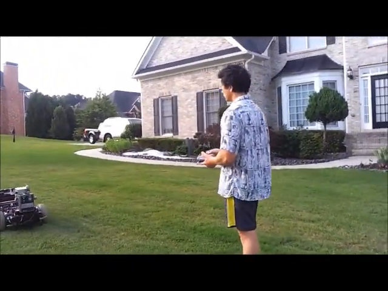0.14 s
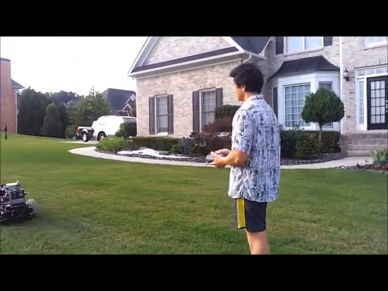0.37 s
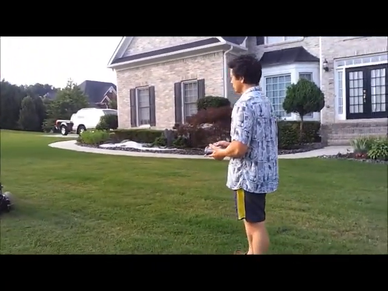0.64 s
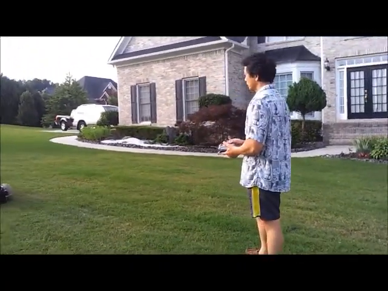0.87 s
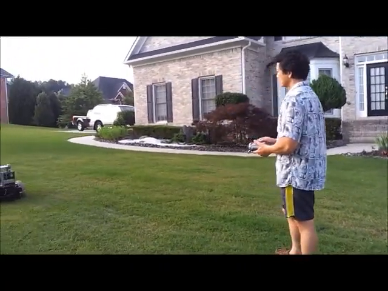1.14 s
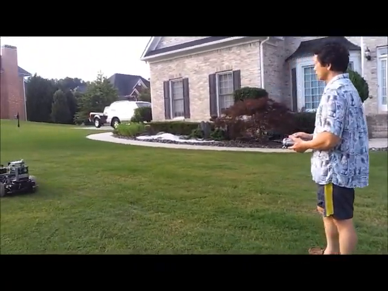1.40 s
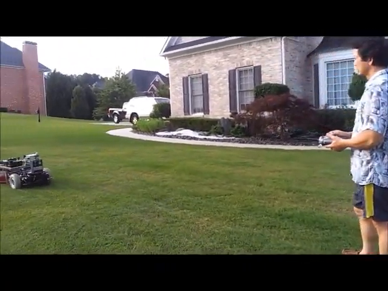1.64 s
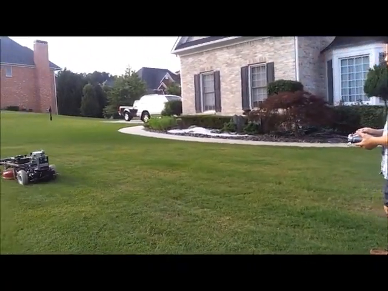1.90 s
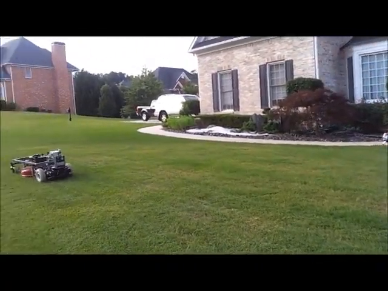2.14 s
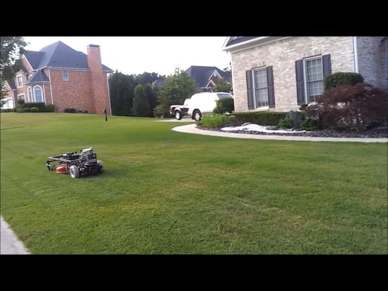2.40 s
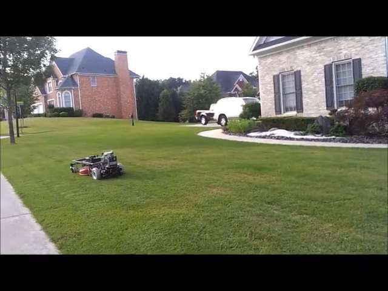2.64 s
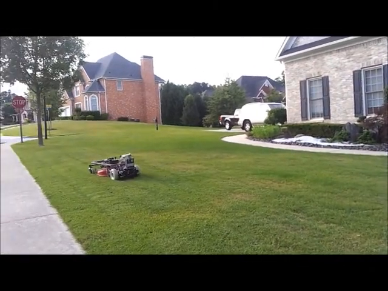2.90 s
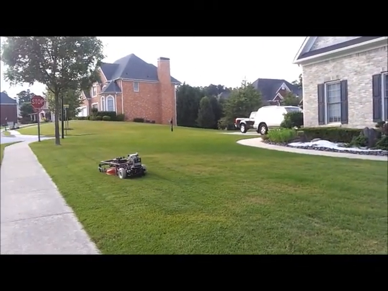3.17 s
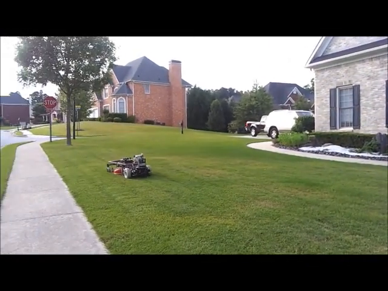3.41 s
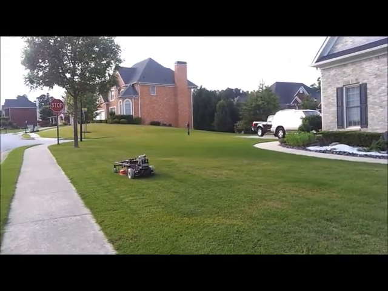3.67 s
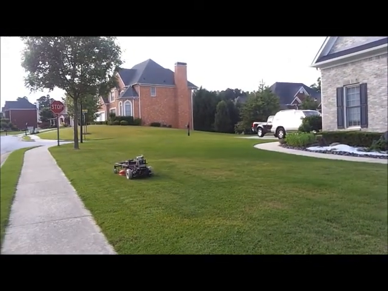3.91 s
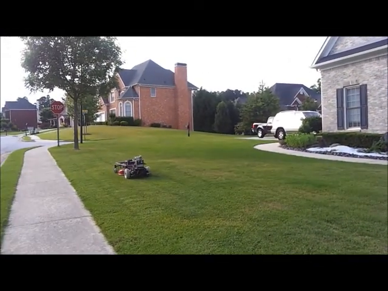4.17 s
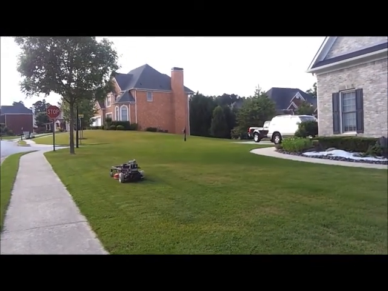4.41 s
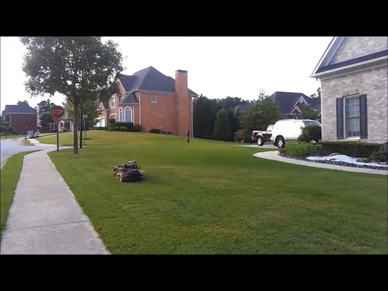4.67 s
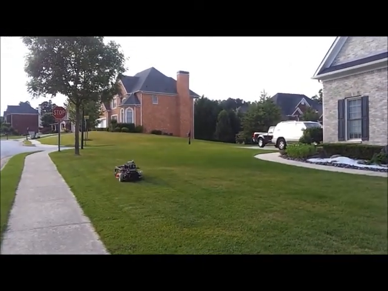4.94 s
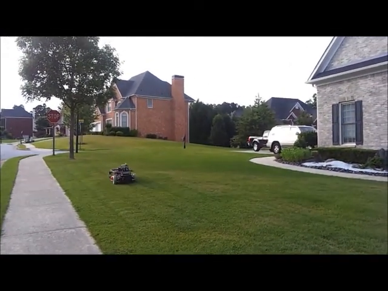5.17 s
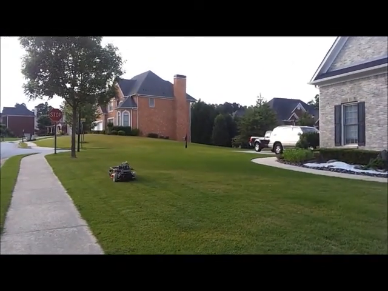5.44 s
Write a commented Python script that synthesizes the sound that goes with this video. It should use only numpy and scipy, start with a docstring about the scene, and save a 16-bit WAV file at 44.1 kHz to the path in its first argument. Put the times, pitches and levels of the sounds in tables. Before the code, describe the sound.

A small petrol lawnmower putters unevenly across an open lawn, its hissing, rattling exhaust fading as it drives away from the listener.

```python
"""Lean mower driving away

On a lawn, a small four-stroke mower engine runs lean and draws away from one microphone point.
About every other cycle fails to fire. Each exhaust stroke thumps in the muffler, rattles its shell
and blows a hissing jet through the outlet, whose plate rings. The blade hums and roars under the deck;
late on, a chip ticks against it. Pulses, shaped noise, resonators and two sines make these sounds."""
import sys
import numpy as np
from scipy import signal
from scipy.io import wavfile
from scipy.ndimage import uniform_filter1d, map_coordinates

SR = 44100
rng = np.random.default_rng(int(sys.argv[2]) if len(sys.argv) > 2 else 0)


def attenuation_scalar(level_db):
    """Turn a level in dB into a linear amplitude multiplier (20 dB per decade)."""
    decades = np.asarray(level_db, float) / 20
    return 10 ** decades


def dump(signal):
    """Clip the signal to [-1, 1] and save it as 16-bit WAV at the path in sys.argv[1]."""
    limited = np.clip(np.atleast_2d(signal).T, -1, 1)
    pcm = np.round(limited * 32767).astype(np.int16)
    wavfile.write(sys.argv[1], SR, pcm)


N = 245195  # samples

# The mower draws away and turns: t/s, loss as level/dB, turned away [0-1]
DRAWING_AWAY = [(0, 0.0, 0.27), (.5, -0.65, 0.24), (.9, 0.5, 0.3), (1.4, -0.2, 0.37), (2.15, -0.9, 0.47),
                (2.4, -3.5, 0.52), (3.2, -5, 0.58), (3.5, -7.5, 0.65), (4.1, -7.5, 0.66), (4.5, -8.5, 0.75),
                (5.1, -9.5, 0.63), (5.56, -9.5, 0.7)]
# The governor hunts: t/s, rate [exhaust strokes per s]
STROKE_RATE = [(0, 23.85), (.4, 23.81), (.75, 23.63), (1.35, 23.92), (2.1, 23.63), (2.7, 24.02),
               (3.1, 23.85), (3.4, 24.06), (3.9, 23.75), (4.15, 23.96), (4.3, 23.45), (4.65, 23.26),
               (4.82, 24.03), (5.15, 23.64), (5.56, 23.55)]
# Firing and misfire take turns, but these strokes repeat the one before: t/s
REPEATED_STROKES = [.733, .818, 1.197, 1.406, 2.625, 2.834, 3.377, 4.172, 4.256, 4.384, 4.513, 4.684, 4.853,
                    5.231, 5.401, 5.485, 5.528]
# Strokes whose jet stands out, loud or faint: t/s, level/dB against its neighbours
ODD_JETS = [(.018, 2), (.144, 5), (.606, 4), (.649, 5.5), (.733, 2.5), (.775, 7.5), (.818, 6), (.987, -1),
            (1.029, -4), (1.071, 3.5), (1.155, 8), (1.197, -7), (1.406, -17), (1.574, 5), (1.658, 5),
            (1.742, 2.5), (1.868, 1), (1.995, 11), (2.037, -3), (2.079, 7.5), (2.248, 6), (2.542, -3.5),
            (3.085, 6), (3.127, 3), (3.169, 5), (3.211, 3.5), (3.336, 5), (3.377, -9), (3.544, 0),
            (3.795, -0.5), (3.963, 1.5), (4.172, 8), (4.214, -6), (4.727, -6.5), (4.811, -7), (4.853, 2.5),
            (4.936, 4.5), (5.02, 2), (5.273, 5), (5.485, -1.5), (5.528, 3.5)]
# The blade hum wavers: t/s, tone level/dB, octave level/dB
BLADE_HUM = [(0, -37, -40.5), (.55, -45.5, -37), (.95, -43, -43), (1.4, -48, -39), (1.7, -42, -38.5),
             (2.2, -42.5, -44.5), (2.4, -39, -40), (3.15, -40, -45), (3.3, -39, -36), (3.45, -37.5, -50.5),
             (3.75, -40.5, -43), (4, -43.5, -58), (4.4, -48.5, -42), (5.05, -48.5, -47.5),
             (5.3, -70, -38.5), (5.56, -59, -58)]
# Colour of the deck roar, side on and then turned away: f/Hz, relative level/dB per Hz
ROAR_COLOURS = ([(210, 0.5), (300, 7), (370, -1), (560, 1), (820, 0), (949, -1), (1320, -10), (1590, -13),
                 (1880, -3.5), (2200, -18.5), (3740, -3.5), (5190, -9), (6760, -5), (8810, -0.5),
                 (10600, 2.5), (13000, -5), (14500, -11.5)], [(210, 8.5), (300, 9), (360, 0.5), (450, 5),
                 (604, -0.5), (878, -7), (1090, 1), (1490, 1), (1940, -3), (2170, 11), (2420, -14),
                 (2610, -13), (3460, -10), (4650, -2.5), (6400, -8.5), (9820, -3), (14500, -6)])
# Colour of the jet, side on and then turned away: f/Hz, relative level/dB per Hz
JET_COLOURS = ([(1760, -38), (3000, -34), (3750, -35), (4060, -17), (4400, -20), (5150, -10.5),
                (5990, -9.5), (7850, -8.5), (8840, -7), (10600, 7), (13000, -7), (14100, -13),
                (15000, -20.5)], [(1760, -8.5), (3000, -4.5), (3450, -11), (4230, -9.5), (5950, -11),
                (6880, -6.5), (7550, -6), (8170, -5.5), (8960, -3.5), (9890, 2), (11700, -4.5),
                (12600, -1.5), (14500, -4.5)])
# The bright band of the hiss wanders as the mower turns: t/s, f/Hz, lift as level/dB
BRIGHT_BAND = [(0.1, 10500, 0.5), (0.98, 10600, 2.5), (1.29, 10050, 5), (2.23, 10800, 4), (2.5, 9600, 3.5),
               (3.68, 11800, 2.5), (4.17, 9300, 2), (5.27, 9500, 5.5), (5.45, 10600, 3)]
# A hollow below the bright band drifts and deepens: t/s, f/Hz, depth as level/dB
DRIFTING_HOLLOW = [(0, 6700, 2), (1.1, 6800, 1), (1.6, 6740, -1), (2.9, 6760, 6), (3.5, 6070, 7),
                   (4, 6140, 0.5), (5.1, 6000, 12), (5.56, 6170, 5)]
# Shell rattle of a fired and of a missed stroke: t/ms after the stroke mark, rise/ms, fall/ms, level/dB
FIRED_BURSTS = [(-14, 1, 3.1, 6.5), (-4.5, 1, 6.9, -0.5), (3.5, 1, 5.6, 0.5)]
MISSED_BURSTS = [(-6, 0.15, 5.8, 2.1), (3, 0.28, 2.8, 5.9)]
# Resonances of the shell: f/Hz, width/Hz, side-on level/dB, turned-away level/dB
SHELL_MODES = [(464, 31, -5, -6), (704, 130, -1, -4), (1101, 148, -2, 3), (1339, 102, 7, -2.5),
               (1862, 94, 6, -4.5), (2080, 220, -5.5, -1.5), (2590, 285, -7.5, 4),
               (3350, 1100, -10.5, -1.5), (3910, 470, -3.5, 2.5), (5050, 1600, -5.5, -5.5)]
# Rings of the outlet plate slide as the mower turns: t/s, f/Hz, level/dB against the jet
PLATE_LOW = [(0, 2570, -36), (1.2, 2720, -32), (1.5, 2770, -26), (2.15, 2750, -20.5), (2.5, 2640, -20),
             (3.2, 2600, -19.5), (3.7, 2640, -20), (4.4, 2590, -17), (5, 2580, -21), (5.56, 2590, -21.5)]
PLATE_HIGH = [(0, 5200, -23), (.6, 5180, -23.5), (1.05, 5200, -18), (1.3, 5300, -30), (1.6, 5250, -26),
              (1.9, 5200, -28), (2.1, 5080, -23), (2.4, 5020, -22.5), (3.2, 4960, -21), (3.6, 4980, -27),
              (4.4, 4970, -26), (5.56, 4970, -32)]
# Muffler pulses of every push, of the blowdown of a firing and of the gas sucked back by a misfire:
# t/ms after the stroke mark, f/Hz, t60/s, level/dB, sign
PUSH_PULSES = [(3.2, 154, .048, -1, 1), (.7, 224, .026, 0, -1)]
BLOWDOWN_PULSES = [(-7.7, 171, .059, 1.5, -1), (-17.1, 225, .108, -6, -1), (-17, 700, .03, -8, 1)]
BACKFLOW_PULSES = [(-6.3, 278, .116, -9.5, 1), (-4.3, 127, .01, 7, -1), (-5, 650, .012, -6, -1)]
# A chip strikes the deck: t/s, level/dB before the band-pass, f/Hz
CHIP_STRIKE = [(4.1643, -19.5, 2660), (4.1646, -18.5, 3080)]


def in_time(rows):
    """Columns of a curve, interpolated at every sample."""
    s, *columns = np.transpose(rows)
    return [np.interp(np.arange(N) / SR, s, column) for column in columns]


def rms_one(x):
    """Scale to unit rms."""
    return x / np.sqrt(np.mean(x ** 2) + 1e-20)


def lowpass(x, order, cutoff_hz):
    """Butterworth low-pass."""
    return signal.sosfilt(signal.butter(order, cutoff_hz, fs=SR, output="sos"), x)


def bandpass(x, low_hz, high_hz):
    """Butterworth band-pass."""
    return signal.sosfilt(signal.butter(2, [low_hz, high_hz], "band", fs=SR, output="sos"), x)


def clicks(s, size):
    """Impulses at the given times."""
    out = np.full(N, 1e-18)
    at = np.round(s * SR).astype(int)
    inside = (at >= 0) & (at < N)
    out[at[inside]] += (size * np.ones(len(at)))[inside]
    return out


def ring(x, hz, t60):
    """A unit click sets a decaying sine of starting height 1 ringing."""
    r, w = attenuation_scalar(-60 / (t60 * SR)), 2 * np.pi * hz / SR
    return signal.lfilter([0, np.sin(w)], [1, -2 * r * np.cos(w), r * r], x)


def swell(s, size, rise_ms, fall_ms):
    """Envelopes that peak at the given times, growing and dying exponentially."""
    x = clicks(s, size)
    up, down = np.exp(-1000 / (SR * np.array([rise_ms, fall_ms])))
    after = signal.lfilter([1], [1, -down], x)
    before = signal.lfilter([0, up], [1, -up], x[::-1])[::-1]
    return after + before


def flutter(rate_hz, depth_db):
    """Fast random gain of turbulence."""
    return attenuation_scalar(depth_db * rms_one(lowpass(rng.standard_normal(N), 2, rate_hz)))


def coloured(spectra, turned, patchy_db):
    """Noise of rms 1 passing from side-on to turned-away colour, in flickering patches."""
    hz, s, frames = signal.stft(rng.standard_normal(N), SR, nperseg=512)
    at = np.minimum(s * SR, N - 1).astype(int)
    hz = np.maximum(hz, 1)[:, None]
    side_on, away = (np.interp(np.log(hz), np.log(f), db) for f, db in map(np.transpose, spectra))
    bright_hz, lift_db = in_time(BRIGHT_BAND)
    hollow_hz, depth_db = in_time(DRIFTING_HOLLOW)
    db = side_on + turned[at] * (away - side_on)
    db += lift_db[at] * np.exp(-((hz - bright_hz[at]) / 1570) ** 2)  # width/Hz
    db -= depth_db[at] * np.exp(-((hz - hollow_hz[at]) / 520) ** 2)
    # each patch spans about 3 bins and 4 frames
    grid = np.indices(db.shape) / [[[3]], [[4]]]
    patches = map_coordinates(rng.standard_normal(db.shape), grid, order=1)
    gain = attenuation_scalar(db + patchy_db * patches)
    gain /= np.sqrt(np.mean(attenuation_scalar(db) ** 2, axis=0))  # even level from frame to frame
    return rms_one(signal.istft(frames * gain, SR, nperseg=512)[1][:N])


def strokes():
    """Exhaust stroke times, whether each fired, how far its jet stands out, and the running stroke count."""
    rate, = in_time(STROKE_RATE)
    count, t = np.cumsum(rate) / SR, np.arange(N) / SR
    count -= np.interp(0.0182, t, count)  # t/s of the first stroke, itself a misfire
    s = np.interp(np.arange(int(count[-1]) + 1), count, t)

    def nearest(times):
        return np.abs(s[:, None] - times).argmin(axis=0)

    changes, odd_db = np.ones(len(s), int), np.zeros(len(s))
    changes[nearest(np.array(REPEATED_STROKES))] = 0
    odd_s, odd_level_db = np.transpose(ODD_JETS)
    odd_db[nearest(odd_s)] = odd_level_db
    fired = np.cumsum(changes) % 2 == 0
    return s, fired, odd_db, count


def blade(count):
    """Two blade tips, two turns a cycle: four passes for every stroke sound a tone and its octave."""
    tone_db, octave_db = in_time(BLADE_HUM)
    passes = 8 * np.pi * count  # phase in radians
    tone = attenuation_scalar(tone_db) * np.cos(passes - 2.25)
    octave = attenuation_scalar(octave_db) * np.cos(2 * passes + 0.2)
    return np.sqrt(2) * (tone + octave)


def rumble():
    """Low churning of air under the deck."""
    return rms_one(bandpass(rng.standard_normal(N), 70, 330))


def deck_roar(turned):
    """Turbulent air under the deck: coloured noise with a fast random gain."""
    return flutter(rate_hz=62, depth_db=1.5) * coloured(ROAR_COLOURS, turned, patchy_db=3.5)


def shell(fired, missed, turned):
    """Knocks and noise bursts at the valve events ring the resonances of the sheet metal."""
    envelope, knocks = 0.56, 0  # the noise never quite stops between bursts
    for s, bursts in ((fired, FIRED_BURSTS), (missed, MISSED_BURSTS)):
        for ms, rise, fall, db in bursts:
            luck_db = 1.3 * rng.standard_normal(len(s))
            envelope = envelope + swell(s + ms / 1000, attenuation_scalar(db + luck_db), rise, fall)
            # a knock starts each burst, 15.5 dB against its noise
            knocks = knocks + clicks(s + (ms - rise) / 1000, attenuation_scalar(db + 15.5))
    drive = envelope * rng.standard_normal(N) + knocks
    growl_db = 6.5 * (1 - turned)  # lift of the low resonances, gone when turned away
    out = 0
    for k, (hz, width, side_db, away_db) in enumerate(SHELL_MODES):
        r = np.exp(-np.pi * width / SR)
        poles = [1, -2 * r * np.cos(2 * np.pi * hz / SR), r * r]
        mode = signal.lfilter([(1 - r * r) / 2, 0, (r * r - 1) / 2], poles, drive)
        gain = attenuation_scalar(side_db + turned * (away_db - side_db) + growl_db * (hz < 800))
        sign = (-1) ** k  # neighbouring modes alternate in sign
        out = out + sign * gain * flutter(rate_hz=16, depth_db=1.5) * mode
    return rms_one(lowpass(out, 6, 5700))


def moving_ring(x, rows, width_hz):
    """A resonance whose centre slides: shift down, one-pole low-pass, shift back; white noise keeps its rms."""
    hz, db = in_time(rows)
    turn = np.exp(2j * np.pi * np.cumsum(hz) / SR)
    r = np.exp(-np.pi * width_hz / SR)
    low = signal.lfilter([np.sqrt(2 - 2 * r * r)], [1, -r], x / turn)
    return attenuation_scalar(db) * np.real(turn * low)


def jet(s, fired, odd_db, turned):
    """Blowdown strikes suddenly; the piston push swells slowly and trails off; both ring the outlet plate."""
    luck = rng.standard_normal((len(s), 3))
    early = s - (6.63 + 0.63 * luck[:, 1]) / 1000  # blowdown, ms ahead of the mark with jitter
    late = s + (0.74 + 0.69 * luck[:, 1]) / 1000   # push after a misfire, ms behind it

    def flow(odd_share):
        """Envelope of the gas flow."""
        db = odd_share * odd_db + 1.1 * luck[:, 0]
        envelope = swell(early, fired * attenuation_scalar(-7.5 + db), rise_ms=0.56, fall_ms=1.74)
        envelope += swell(s, fired * attenuation_scalar(-14 - 2.5 * luck[:, 2]), rise_ms=3.4, fall_ms=4.3)
        envelope += swell(late, ~fired * attenuation_scalar(-9.5 + db), rise_ms=2.4, fall_ms=3.9)
        return uniform_filter1d(envelope, size=80)  # the valve stays open a moment: rounded tops

    hiss = attenuation_scalar(-2.0) * coloured(JET_COLOURS, turned, patchy_db=1.5)
    dull = signal.sosfiltfilt(signal.butter(2, 8900, fs=SR, output="sos"), hiss)
    bright = hiss - dull
    drive = (flow(odd_share=0.4) + attenuation_scalar(-36.5)) * rng.standard_normal(N)
    plate = 0
    for rows, width_hz in ((PLATE_LOW, 110), (PLATE_HIGH, 160)):
        plate = plate + moving_ring(drive * flutter(rate_hz=12, depth_db=1.76), rows, width_hz)
    # the duller part varies less from stroke to stroke than the bright hiss
    return flow(odd_share=1) * bright + flow(odd_share=0.41) * dull + plate


def deck_echo(x):
    """The steel deck under the engine returns a faint copy, 1.75 ms later and 17 dB down."""
    return x + attenuation_scalar(-17) * np.roll(x, int(1.75 * SR / 1000))


def thumps(s, pulses, spread_db):
    """Each pulse rings briefly in the muffler volume, a little different every stroke."""
    luck = rng.standard_normal((len(s), len(pulses)))
    out = 0
    for k, (ms, hz, t60, db, sign) in enumerate(pulses):
        size = sign * attenuation_scalar(db + spread_db * luck[:, k])
        out = out + ring(clicks(s + ms / 1000, size), hz, t60)
    return out


def muffler(fired, missed):
    """Every stroke pushes; a firing adds the blowdown before it, a misfire sucks gas back."""
    out = thumps(np.r_[fired, missed], PUSH_PULSES, spread_db=1.3)
    out += thumps(fired, BLOWDOWN_PULSES, spread_db=2.2)
    out += thumps(missed, BACKFLOW_PULSES, spread_db=1.8)
    return lowpass(out, 2, 1200)


def tick():
    """A chip's short knock on the deck rings two of its modes."""
    knock = sum(ring(clicks(np.array([s]), attenuation_scalar(db)), hz, t60=0.014) for s, db, hz in CHIP_STRIKE)
    return bandpass(knock, 2200, 3700)


def scene():
    """Engine and deck, heard from one point; the loss with distance is shared out layer by layer."""
    loss_db, turned = in_time(DRAWING_AWAY)
    turned = np.clip(turned, 0, 1)
    s, fired, odd_db, count = strokes()
    roar = attenuation_scalar(-30.5 + 0.56 * loss_db) * deck_roar(turned)
    rattle = attenuation_scalar(-32 + loss_db) * shell(s[fired], s[~fired], turned)
    exhaust = attenuation_scalar(loss_db) * jet(s, fired, odd_db, turned)
    low = attenuation_scalar(-25 + 0.45 * loss_db) * (muffler(s[fired], s[~fired]) + attenuation_scalar(-21.5) * rumble())
    # the blade hum follows its own level curve
    mono = deck_echo(roar + rattle + exhaust + tick()) + low + blade(count)
    return np.array([mono, mono])


def roll_off(x):
    """The treble ends steeply here."""
    return signal.sosfilt(signal.butter(12, 15950, fs=SR, output="sos"), x)


def record(dry):
    """A single microphone on both channels: the recorder rounds peaks, and bass and top are cut."""
    mix = np.tanh(dry)  # saturates at full scale
    mix = signal.sosfilt(signal.butter(4, 56, "high", fs=SR, output="sos"), mix)
    mix = signal.sosfilt(signal.cheby2(12, 60, 15600, fs=SR, output="sos"), mix)
    return roll_off(mix)


dry = scene()
out = record(dry)
dump(out)
```